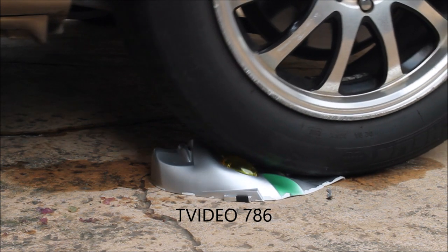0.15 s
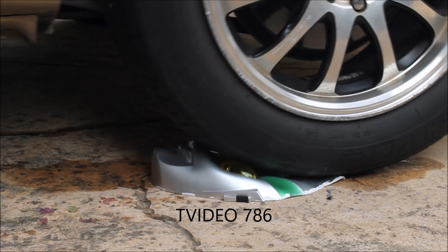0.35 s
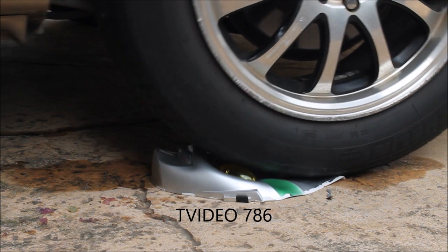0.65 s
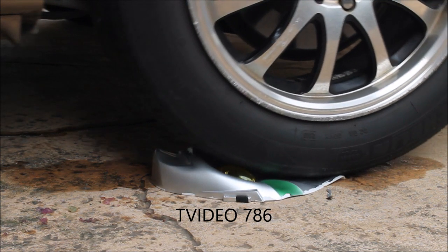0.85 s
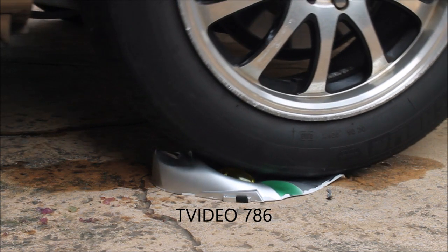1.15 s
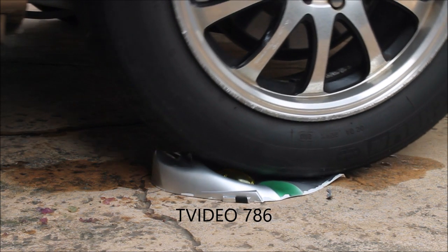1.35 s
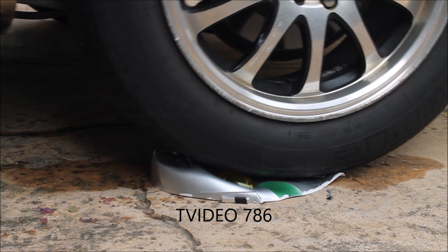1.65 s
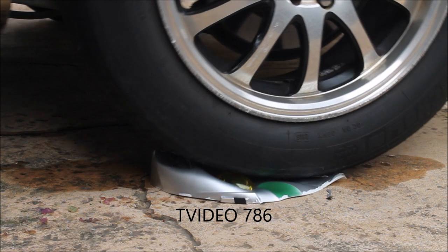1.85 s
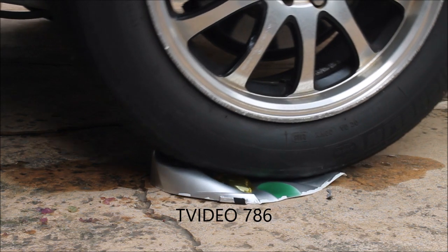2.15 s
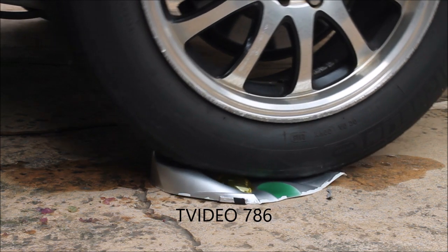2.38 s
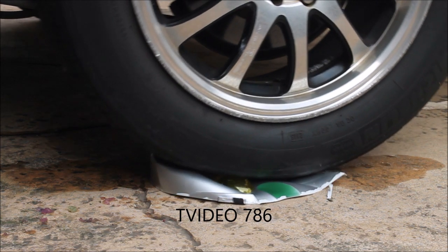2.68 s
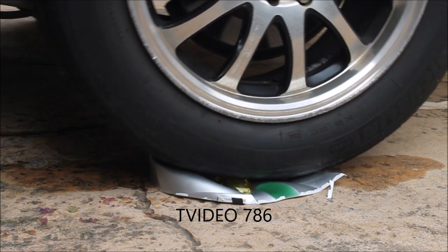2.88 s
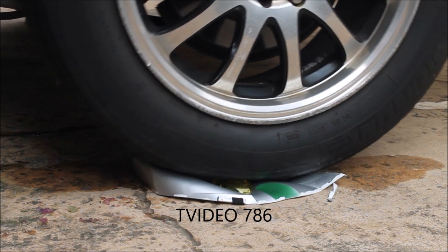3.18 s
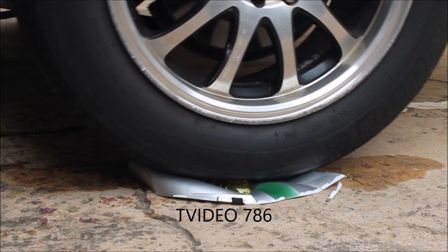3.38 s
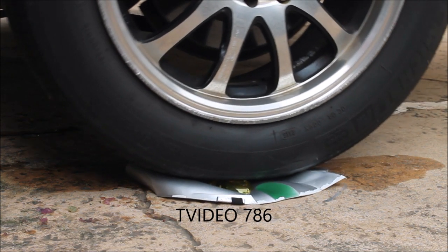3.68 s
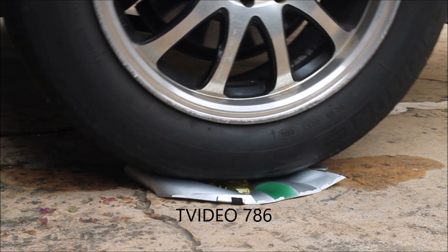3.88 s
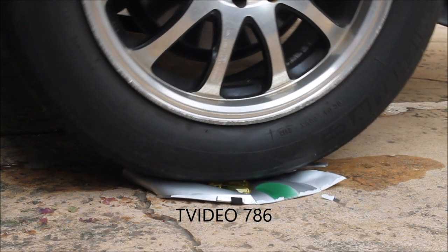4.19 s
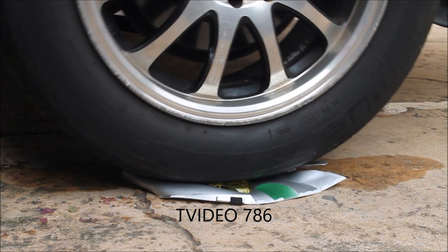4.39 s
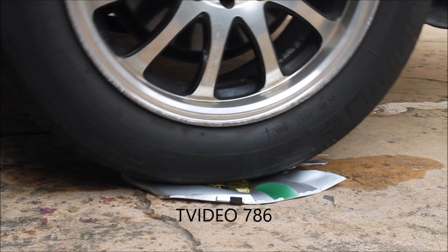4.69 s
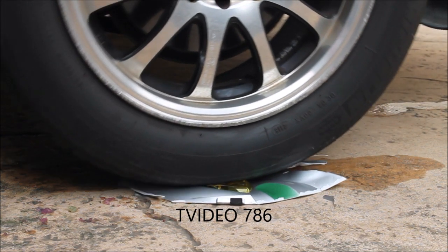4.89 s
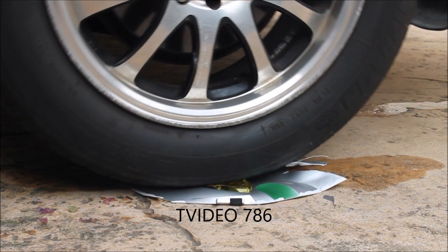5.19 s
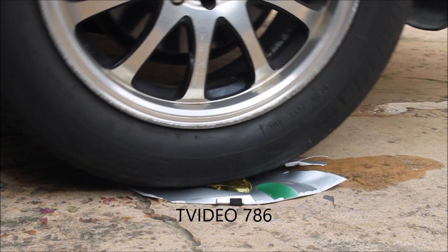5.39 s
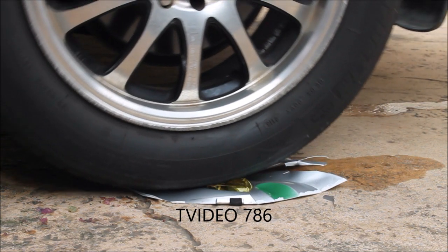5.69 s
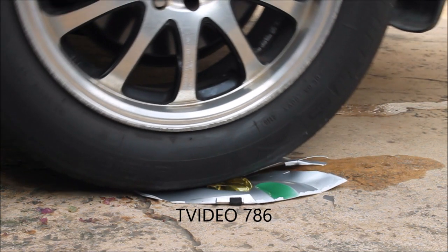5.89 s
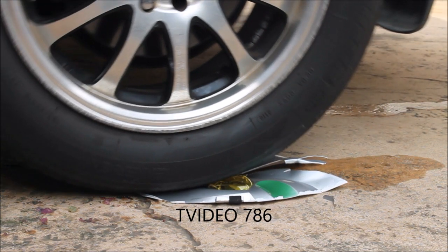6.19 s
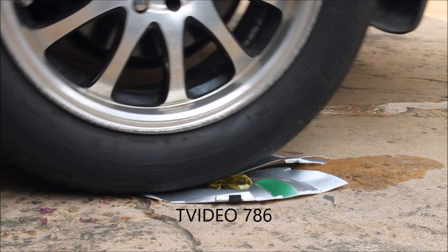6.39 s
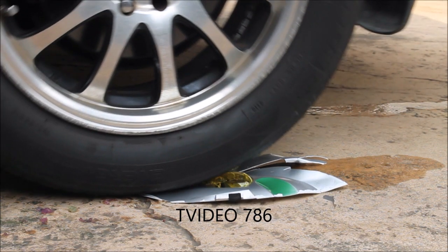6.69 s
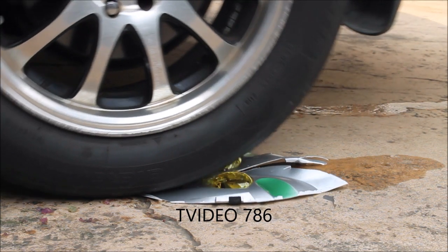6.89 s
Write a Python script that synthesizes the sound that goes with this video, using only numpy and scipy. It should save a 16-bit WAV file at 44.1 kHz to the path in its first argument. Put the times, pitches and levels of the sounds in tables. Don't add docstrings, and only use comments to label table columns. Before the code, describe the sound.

Distorted, sharp plastic cracks burst out as a tyre rolls slowly over a hollow shell. Hollow thuds and crunchy tearing accompany them, sometimes in rapid clusters, sometimes after short gaps filled by held-up noisy reverberation. An idling engine rumbles quietly and pulls briefly midway. Later breaks weaken into settling clicks. The sound is close, loud and clipped, with little high treble, in a reflective covered place.

```python
import sys
import numpy as np
from scipy import signal
from scipy.fft import rfft, irfft, next_fast_len
from scipy.io import wavfile

SR = 44100
rng = np.random.default_rng(int(sys.argv[2]) if len(sys.argv) > 2 else 0)


def magnitude_from_level(level_db):
    exponent = np.asarray(level_db, float) / 20
    return 10 ** exponent


def dump_mix(stems):
    frames = np.atleast_2d(stems).T
    limited = np.clip(frames, -1, 1)
    pcm = np.round(limited * 32767).astype(np.int16)
    wavfile.write(sys.argv[1], SR, pcm)


N = 310905


def in_time(rows):
    s, *columns = np.transpose(rows)
    return np.array([np.interp(np.arange(N) / SR, s, c) for c in columns])


def rms_one(x):
    return x / np.sqrt(np.mean(x ** 2) + 1e-20)


def peak_one(x):
    return x / (np.abs(x).max() + 1e-20)


def drift(rate):
    r = np.exp(-80 * np.pi * rate / SR)
    slow = signal.lfilter([1], [1, -2 * r, r * r], rng.standard_normal(N // 40 + 2002))
    slow = rms_one(slow[2000:])
    return np.interp(np.arange(N) / 40, np.arange(len(slow)), slow)


def resonate(x, hz, width_hz):
    r = np.exp(-np.pi * width_hz / SR)
    top = np.array([1, 0, -1]) * (1 - r * r) / 2
    return signal.lfilter(top, [1, -2 * r * np.cos(2 * np.pi * hz / SR), r * r], x)


def band(x, low_hz, high_hz, order=2):
    return signal.sosfilt(signal.butter(order, [low_hz, high_hz], "band", fs=SR, output="sos"), x)


# start in seconds, peak in dB, ring in Hz,
# broad crunch in dB re peak, crack in dB re peak.
SPLINTERS = [(0.45, 7, 724, 4, -7.5), (1.173, -1, 684, 11, -9), (1.5, -0.5, 873, -6.5, 14.5),
             (1.53, 0.5, 688, 8, 1), (1.719, 3.5, 720, 8, 5), (2.04, -6, 610, 2.5, 3.5),
             (2.046, 0.5, 845, 21, 25), (2.228, -4, 904, 11, -14), (2.796, -2, 1910, 4, -0.5),
             (3.352, -0.5, 2320, -17, 6.5), (3.398, -14, 2800, -7, -12), (3.441, -1.5, 1160, 1.5, 9),
             (3.791, -0.5, 594, 2, -5.5), (3.841, -5, 1550, -15, 0), (4.464, 9, 702, 10.5, 11.5),
             (4.554, -2.5, 1000, 27, -17), (5.027, -24.5, 1700, -18, 3), (6.187, -13, 1480, -15, -7),
             (6.215, -27, 1800, 11, 1), (6.268, -11.5, 1350, -31, -18), (6.465, -8, 760, -7, -12),
             (6.547, -21.5, 610, 11, -16)]
# start in seconds, peak in dB, ring in Hz,
# broad crunch in dB re peak, tearing time in ms.
BREAKS = [(0.776, -1.5, 860, 3.5, 19), (1.099, 10, 636, 2, 3.8), (1.441, 9, 978, -6, 8.2),
          (1.505, -1.5, 817, 5, 9.1), (1.555, -0.5, 680, 2, 5.8), (1.645, -4.5, 780, -4, 3.5),
          (1.777, -2.5, 664, -1, 4.3), (1.853, 0.5, 560, 4, 1.9), (2.078, -1.5, 828, 8.5, 20),
          (2.188, 2.5, 625, 5.5, 9.2), (2.246, -8, 675, 2, 5.6), (2.419, 3.5, 615, 7, 8.2),
          (2.857, 10, 728, 6.5, 6.5), (3.082, 2.5, 654, -1.5, 17), (3.114, -18, 713, -2.0, 6.9),
          (3.828, -1.5, 1280, 1.5, 13), (4.118, 5.5, 575, 2.5, 2.2), (4.146, 1, 1960, 15, 5.1),
          (4.502, -3, 1030, -1, 7.2), (4.593, -1.5, 925, -4.5, 4.3), (4.6, -2, 654, 2, 7.8),
          (4.99, 0, 1980, 4.5, 4.6), (5.041, 6.5, 712, 5.5, 6.9), (5.594, -2.5, 860, -30, 1.9)]
# start in seconds, peak in dB, ring in Hz,
# broad crunch in dB re peak.
TICKS = [(0.644, -24, 867, -4), (1.33, -29, 880, -16), (1.589, -9, 797, 4), (1.824, -16, 686, -9),
         (1.888, -14, 651, 2), (3.249, -4, 670, -16), (3.57, -11, 1080, 1), (3.995, -16, 1610, -4),
         (4.183, -11, 600, 2), (4.376, -13, 2080, -24), (4.694, -16, 1130, -5), (5.15, -3.5, 1280, -13),
         (5.203, -6, 1640, -18), (5.39, -6.5, 1240, -31), (6.183, -10, 870, -11), (6.195, -15, 680, -11),
         (6.301, -10, 1270, -40), (6.338, -19, 883, -4), (6.509, -5, 670, -7), (6.576, -13, 993, -14),
         (1.712, -9, 3000, -9), (1.835, -17, 3180, -11), (4.532, -8.5, 2600, -1), (4.821, -19, 3540, -13),
         (0.793, -9.5, 800, -4)]
SPLINTER_TEAR_MS, TICK_TEAR_MS = 5.2, 7.7
BREAK_CRACK_DB, TICK_CRACK_DB = -41, -25.5


def fractures():
    return ([(s, db, hz, SPLINTER_TEAR_MS, crunch, crack) for s, db, hz, crunch, crack in SPLINTERS]
            + [(s, db, hz, tear, crunch, BREAK_CRACK_DB) for s, db, hz, crunch, tear in BREAKS]
            + [(s, db, hz, TICK_TEAR_MS, crunch, TICK_CRACK_DB) for s, db, hz, crunch in TICKS])


def snaps(size=2048):
    out, t = np.zeros(N + size), np.arange(size) / SR
    events = fractures()
    chance = rng.standard_normal((len(events), 2, size))
    onset = 1 + 0.99 * np.exp(-t / 0.0015)
    for (s, peak_db, ring_hz, tear_ms, crunch_db, crack_db), (sign, jerk) in zip(events, chance):
        tear = max(tear_ms, 0.5) / 1000
        jerks = sign * magnitude_from_level(2.55 * jerk) * onset
        crack = band(jerks * np.exp(-(t / (0.6 * tear)) ** 2), 2800, 6500)
        ring = resonate(jerks * np.exp(-(t / (0.7 * tear)) ** 2), ring_hz, 0.6 * ring_hz)
        ring = resonate(ring, ring_hz, 0.9 * ring_hz)
        crunch = band(jerks * np.exp(-(t / tear) ** 2), 460, 3160)
        snap = peak_one(ring) + magnitude_from_level(crack_db) * peak_one(crack) + magnitude_from_level(crunch_db) * peak_one(crunch)
        true_db = peak_db + 0.7 * max(peak_db + 6, 0)
        out[round(s * SR):][:size] += magnitude_from_level(true_db - 1.73) * peak_one(snap)
    return out[:N]


# start in seconds, peak in dB, pitch in Hz,
# time to fall 60 dB in seconds.
THUDS = [(0.453, 11.5, 296, 0.018), (0.619, -7, 462, 0.053), (0.779, -6, 138, 0.043),
         (1.098, 6, 195, 0.054), (1.176, -9, 190, 0.063), (1.445, -4, 171, 0.05), (1.721, -8, 493, 0.07),
         (1.776, -4, 538, 0.031), (1.855, -11, 181, 0.12), (2.042, -7, 359, 0.025), (2.082, -8, 520, 0.017),
         (2.192, -2.5, 338, 0.062), (2.353, -9.5, 494, 0.12), (2.421, 1, 193, 0.047),
         (2.856, 9.5, 370, 0.041), (3.082, 2, 199, 0.018), (3.246, -9, 231, 0.083), (3.44, -1, 232, 0.055),
         (3.791, -10, 190, 0.048), (3.828, -3.5, 231.6, 0.089), (3.84, -6, 292, 0.019),
         (3.997, -14.5, 247, 0.22), (4.118, -4.5, 275, 0.046), (4.463, -6, 156, 0.048),
         (4.594, 6.5, 382, 0.0096), (5.042, -10.5, 352, 0.069), (5.591, -8.5, 442, 0.03),
         (6.179, -15, 396, 0.04), (6.301, -10, 497, 0.027), (6.508, -22, 456, 0.034)]
THUD_LAG_S = 0.002


def thuds(size=6000):
    out, t = np.zeros(N + size), np.arange(size) / SR
    push = 1 - np.exp(-t / 0.00035)
    for (s, peak_db, hz, t60), (ratio, turn) in zip(THUDS, rng.random((len(THUDS), 2))):
        partner_hz = hz * (1.2 + 0.27 * ratio)
        note = np.sin(2 * np.pi * hz * t) + 0.88 * np.sin(2 * np.pi * (partner_hz * t + turn))
        decay = magnitude_from_level(peak_db + 1.5 - 60 * t / max(t60, 0.005))
        out[round((s + THUD_LAG_S) * SR):][:size] += decay * push * note
    return out[:N]


def walls(x, wet_db=-14):
    dull, out = band(x, 320, 2700), x.copy()
    for delay_s, db in [(.0021, -22.5), (.0049, -27.5), (.0074, -1.5), (.0113, -15.5), (.0157, -17.5)]:
        delay = round(delay_s * SR)
        out[delay:] += magnitude_from_level(wet_db + db) * dull[:-delay]
    return out


# start in seconds, length in seconds,
# pitch in Hz, width in Hz, level in dB.
LINGER = [(0.414, 0.46, 140.6, 18, -21.5), (0.448, .4, 291, 20, -23), (1.072, 0.25, 181.7, 45, -18.5),
          (1.279, .9, 124.6, 58, -32.5), (1.457, 0.16, 955, 700, -21.5), (2.45, 0.26, 162, 25, -28.5),
          (2.427, 0.4, 345, 86, -20), (2.866, 0.14, 120, 34, -22), (3.072, 0.35, 190.6, 9.8, -23.5),
          (3.828, 0.27, 1594, 300, -26.5), (4.156, 0.31, 2055, 380, -32.5), (4.505, .5, 720, 68, -23.5),
          (5.05, 0.31, 337, 10, -25.5), (5.057, 0.23, 1175, 500, -19.5)]


def lingering():
    out, white = np.zeros(N), rng.standard_normal(N)
    for s, length, hz, width_hz, db in LINGER:
        a, n = round(s * SR), round(length * SR)
        done = np.arange(n) / n
        note = resonate(resonate(white[a - 4000:a + n], hz, width_hz), hz, 2 * width_hz)
        swell = np.minimum(1, 12 * np.minimum(done, 1 - done))
        out[a:a + n] += magnitude_from_level(db - 1.8 * done ** 2) * swell * rms_one(note[4000:])
    return out


# start in seconds, level in dB, boom in dB re level,
# rasp in dB re level, time held up in seconds.
ECHOES = [(-0.04, -28, 6, -14, 0.16), (0.447, -15.5, -7, -10, 0.23), (0.774, -20.5, -4, -10.5, 0.1),
          (1.097, -18, -0.5, -6, 0.37), (1.439, -26, 1.5, 6, 0.033), (1.532, -16.5, -4.5, -3.5, 0.28),
          (1.718, -26.5, 0, -2.5, 0.12), (1.855, -19, -6, -10, 0.41), (2.045, -28.5, 9, 0.5, 0.081),
          (2.188, -21, -2, -5.5, 0.37), (2.417, -24, 5, -2, 0.45), (2.578, -30, 2.5, -10.5, 0.085),
          (2.859, -15.5, -8, -3, 0.36), (3.083, -18, -6, -8, 0.5), (3.442, -19.5, -2.5, -9, 0.25),
          (3.792, -25, -1.5, -4.5, 0.34), (4.12, -20, -8.5, -5, 0.24), (4.466, -18, -2.5, -2, 0.12),
          (4.595, -18, -4, -3, 0.29), (4.991, -28.5, 4, -1.5, 0.019), (5.043, -17.5, -8.5, -2.5, 0.41),
          (5.593, -30, -6.5, -12, 0.23), (6.183, -31.5, -7, -21, 0.14), (6.465, -27.5, -11, -15.5, 0.06)]
SAG_DB_PER_S = [
    3.8,
    8.1,
    11,
    44,
]
RELEASE_DB_PER_S = [57, 73, 75, 60]
AMBIENCE_DB = [-32, -32.5, -39.5, -50]
HISS_RE_RASP_DB, ECHO_DELAY_S, SWELL_S = -5.5, 0.0051, 0.022
DUCK_DB, RECOVER_S = -0.5, 0.15


def echo_levels(size=64):
    t = np.arange(0, N + size, size) / SR
    power, dip_db = magnitude_from_level(2 * np.array(AMBIENCE_DB))[:, None], 0
    for s, db, boom_db, rasp_db, held in ECHOES:
        age = np.maximum(t - s - ECHO_DELAY_S, 0)
        start_db = db + np.array([boom_db, 0, rasp_db, rasp_db + HISS_RE_RASP_DB])[:, None]
        loss_db = np.outer(SAG_DB_PER_S, age)
        loss_db = loss_db + np.outer(RELEASE_DB_PER_S, np.maximum(age - held, 0))
        power = power + magnitude_from_level(2 * (start_db - loss_db)) * (1 - np.exp(-age / SWELL_S))
        dip_db = dip_db + DUCK_DB * (t > s) * np.exp(-age / RECOVER_S) * magnitude_from_level(db + 9.5)
    levels_db = 10 * np.log10(power) + dip_db
    return np.array([np.interp(np.arange(N) / SR, t, row) for row in levels_db])


# lower edge in Hz, upper edge in Hz.
WASH_BANDS_HZ = [
    (90, 350),
    (350, 1200),
    (1200, 3000),
    (3000, 5800),
]
# frequency in Hz, density in dB per Hz.
WASH_COLOUR = [(53, -27.5), (90, -12), (134, -3), (248, -1.5), (333, 0), (618, -0.5), (698, -1),
               (951, -5.5), (1070, -6.5), (1890, -14), (5500, -47.5), (7150, -62.5), (12100, -120)]


def wash(shared_db=0.74, own_db=2.0, crackle_db=3.0):
    edges = 80 * 2 ** np.arange(0, 6.4, 1 / 3)
    centres = np.sqrt(edges[1:] * edges[:-1])
    hz, per_hz_db = np.transpose(WASH_COLOUR)
    level_db = np.interp(np.log(centres), np.log(hz), per_hz_db) + 10 * np.log10(np.diff(edges))
    usual_db = []
    for low, high in WASH_BANDS_HZ:
        inside = (centres > low) & (centres < high)
        usual_db.append(10 * np.log10(np.sum(magnitude_from_level(2 * level_db[inside]))))
    change_db = echo_levels() - np.array(usual_db)[:, None]
    place = np.interp(np.log(centres), np.log(np.prod(WASH_BANDS_HZ, axis=1)) / 2, np.arange(4))
    white, clumps, out = rng.standard_normal((2, N)), drift(33), 0
    ticks = (rng.random(N) < 70 / SR) * np.minimum(rng.exponential(1, N), 2.2)
    ticks = signal.lfilter([1], [1, -np.exp(-1 / (0.0024 * SR))], ticks)
    ticks = ticks - ticks.mean()
    for k, p in enumerate(place):
        below = min(int(p), 2)
        db = level_db[k] + (below + 1 - p) * change_db[below] + (p - below) * change_db[below + 1]
        db += shared_db * clumps + own_db * drift(6.1) + crackle_db * p / 3 * ticks
        out = out + magnitude_from_level(db) * rms_one(band(white[k % 2], edges[k], edges[k + 1]))
    return out


# time in seconds, level in dB.
RUMBLE = [(0.0, -37), (0.6, -31), (1.4, -42.5), (2.2, -44), (2.7, -32), (3.3, -36), (4.1, -41), (4.6, -33),
          (5.3, -37.5), (7.05, -35.5)]
# time in seconds, level in dB.
FIRING = [(3.1, -45), (3.22, -28), (3.414, -27), (3.564, -23), (3.776, -22), (3.87, -36), (4.088, -28),
          (4.2, -32), (4.5, -44)]
FIRING_HZ = 58.2


def engine():
    tone_db = np.interp(np.arange(N) / SR, *np.transpose(FIRING), left=-90, right=-90)
    tone = np.sin(2 * np.pi * np.cumsum(FIRING_HZ * (1 + 0.01 * drift(3))) / SR)
    rumble = rms_one(band(rng.standard_normal(N), 33, 80))
    return magnitude_from_level(tone_db - 1) * tone + magnitude_from_level(in_time(RUMBLE)[0]) * rumble


def scene():
    return (walls(snaps() + thuds()) + wash() + lingering() + engine())[None]


# centre in seconds, thinned above in Hz, nearly empty
# above in Hz.
DROPOUTS = [(.559, 2200, 3500), (.753, 2900, 2900), (.879, 2200, 3700), (1.136, 2300, 3000),
            (1.22, 2400, 4900), (1.288, 3000, 3000), (1.671, 2300, 4300), (2.139, 2300, 3800),
            (2.285, 2300, 4200), (4.4, 2500, 3300), (5.273, 2700, 4200), (6.723, 3100, 3100)]


def starve(x, length=0.036, kept=0.5, kept_above=0.07):
    out, n = x.copy(), round(length * SR)
    hz = np.arange(n // 2 + 1) * SR / n
    strip = (hz // 200).astype(int)
    fade = np.hanning(n) ** 0.7
    for (s, thin_hz, empty_hz), luck in zip(DROPOUTS, rng.random((len(DROPOUTS), 120))):
        a = round(s * SR) - n // 2
        survival = np.where(hz > empty_hz, kept_above, kept)
        lost = (hz > thin_hz) & (luck[strip] > survival)
        out[:, a:a + n] -= irfft(rfft(x[:, a:a + n]) * lost, n) * fade * 0.97
    return out


def low_pass(x):
    return signal.sosfilt(signal.butter(12, 15800, fs=SR, output="sos"), x)


HEADROOM_DB, FIRST_CUT_HZ, CUT_WIDTH_HZ = 1, 6267, 930


def record(dry):
    overloaded = np.clip(dry, -magnitude_from_level(HEADROOM_DB), magnitude_from_level(HEADROOM_DB))
    size = next_fast_len(N + SR // 10)
    hz = np.arange(size // 2 + 1) * SR / size
    passed = np.sin(np.pi / 2 * np.clip((FIRST_CUT_HZ - hz) / CUT_WIDTH_HZ, 0, 1)) ** 2
    narrow = irfft(rfft(starve(overloaded), size) * passed, size)[:, :N]
    fade_out = np.minimum(1, np.arange(N, 0, -1) / 200)
    return low_pass(np.clip(narrow, -1, 1) * fade_out)


dry = scene()
out = record(dry)
dump_mix(out)
```